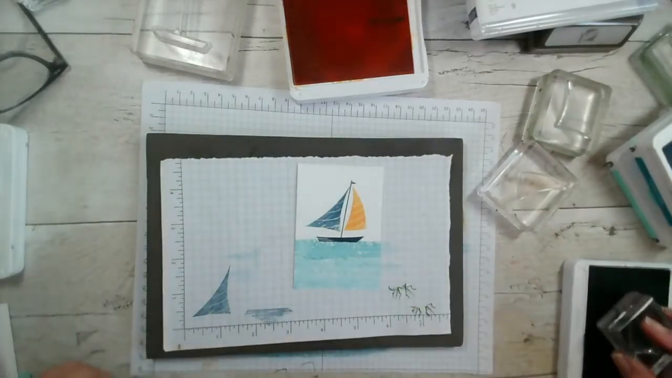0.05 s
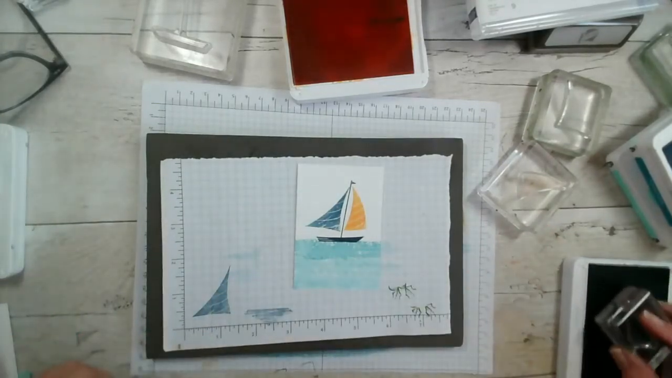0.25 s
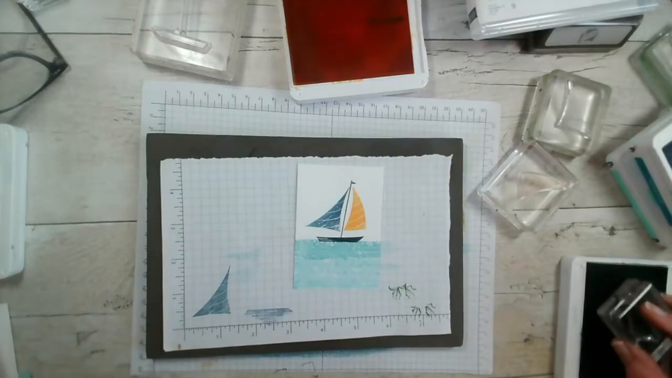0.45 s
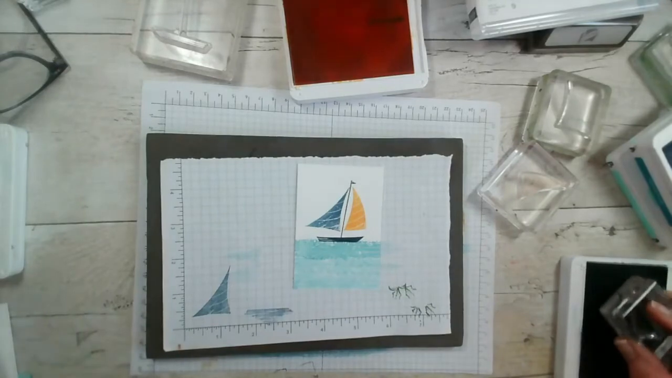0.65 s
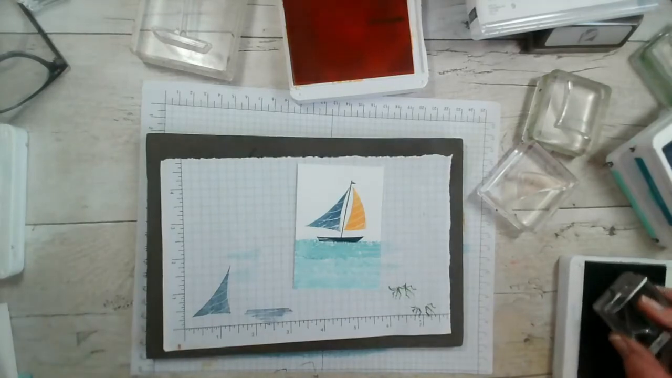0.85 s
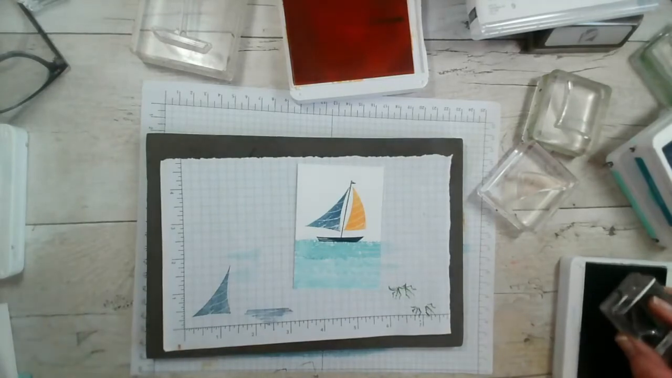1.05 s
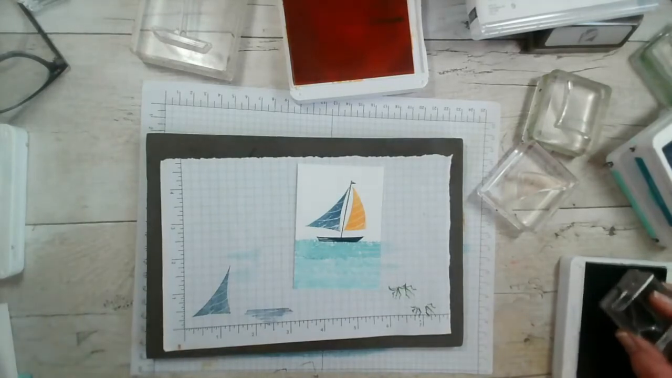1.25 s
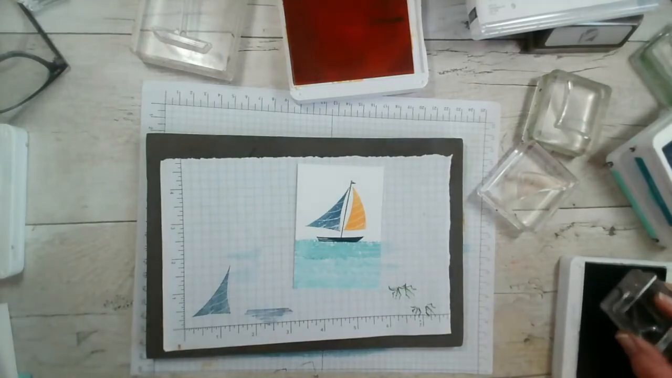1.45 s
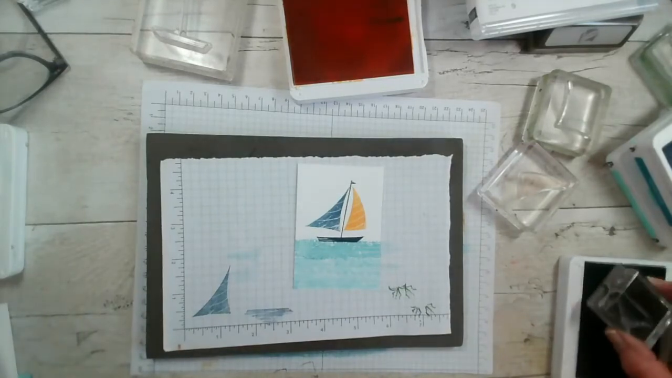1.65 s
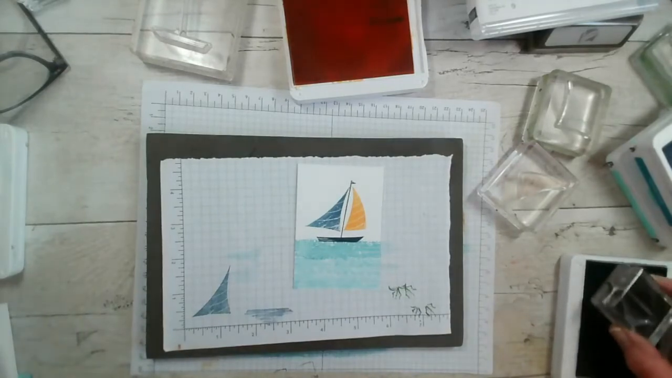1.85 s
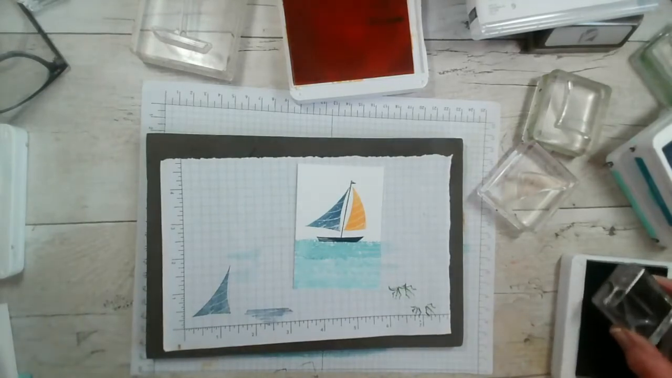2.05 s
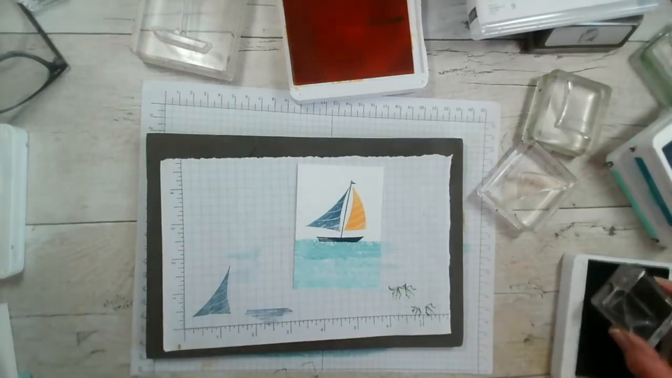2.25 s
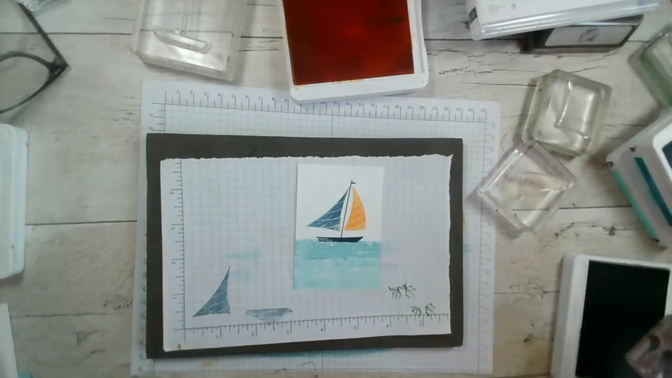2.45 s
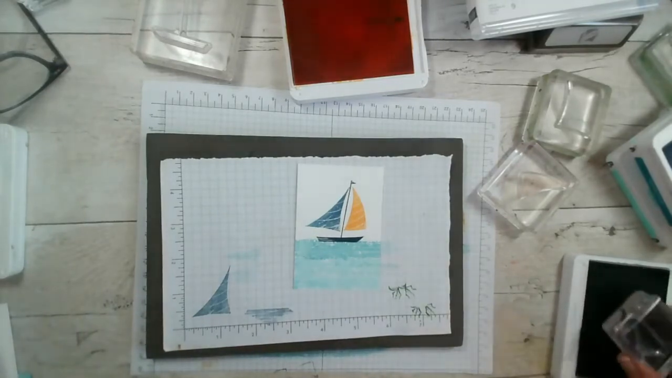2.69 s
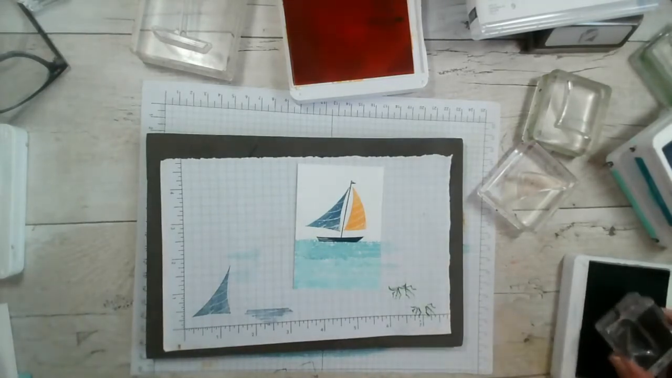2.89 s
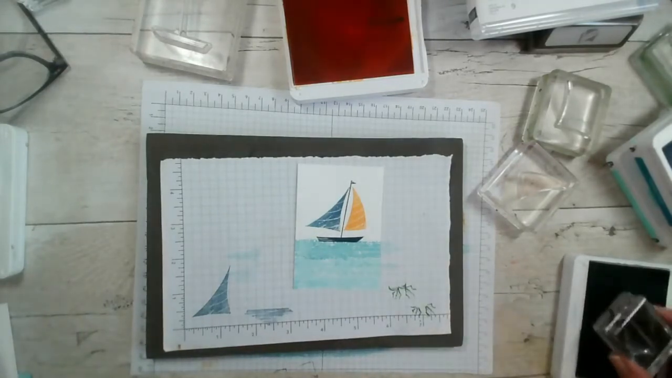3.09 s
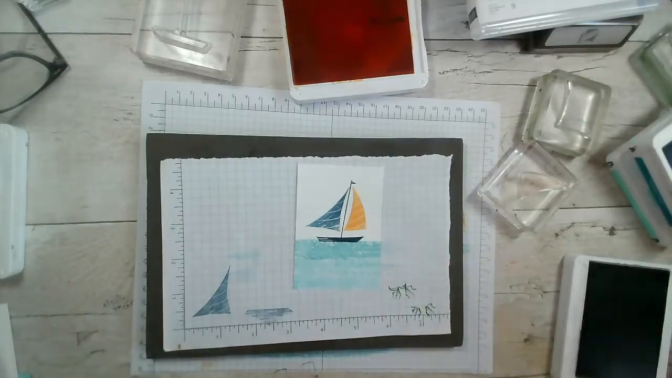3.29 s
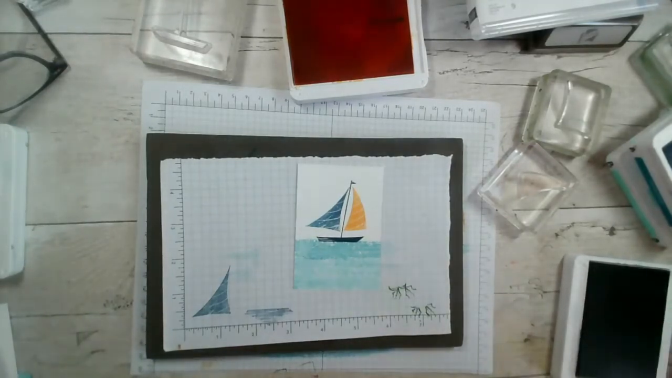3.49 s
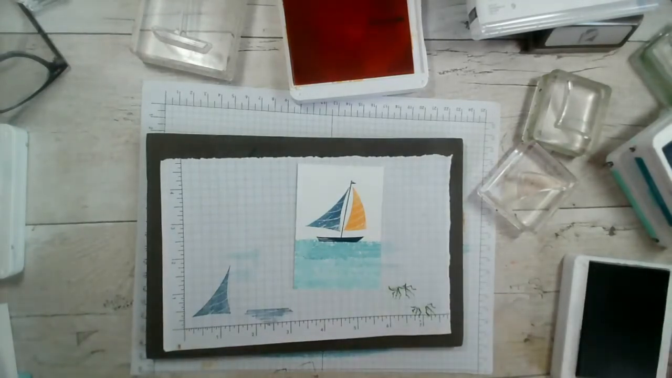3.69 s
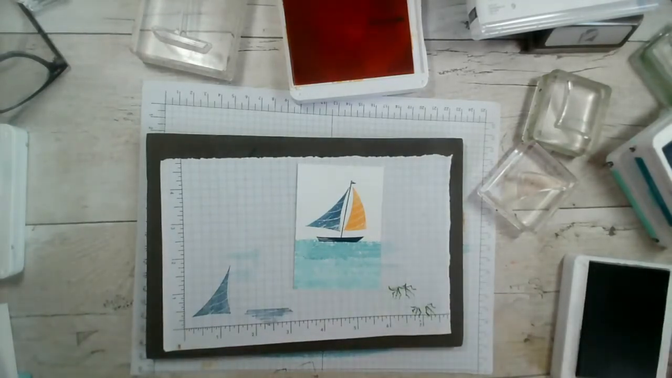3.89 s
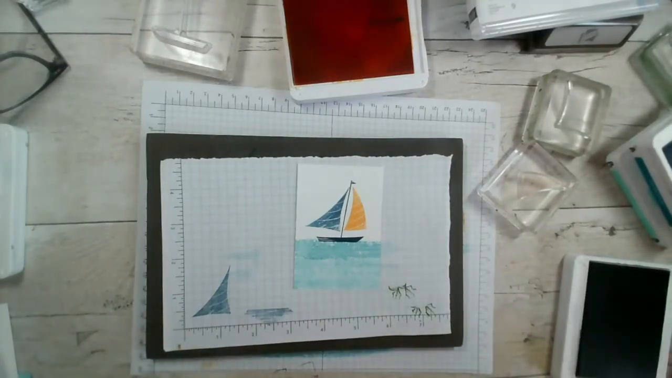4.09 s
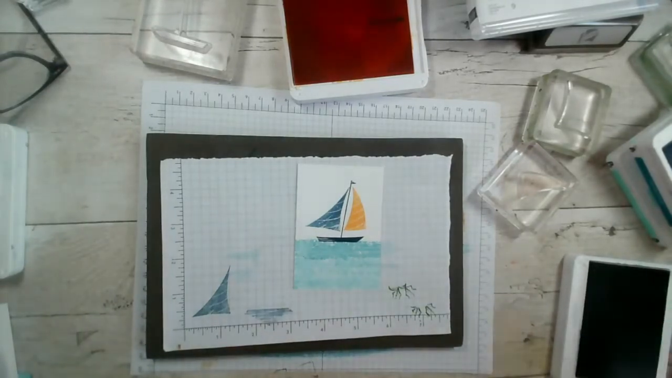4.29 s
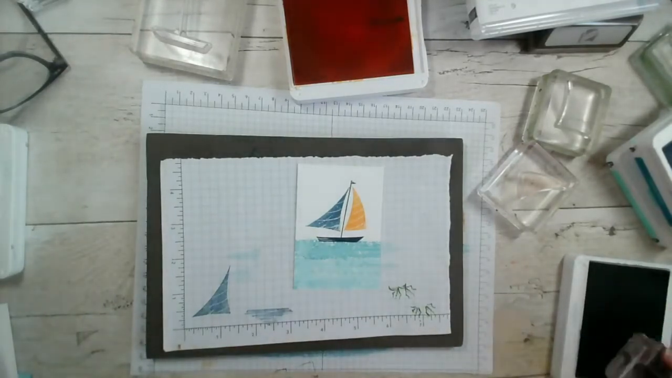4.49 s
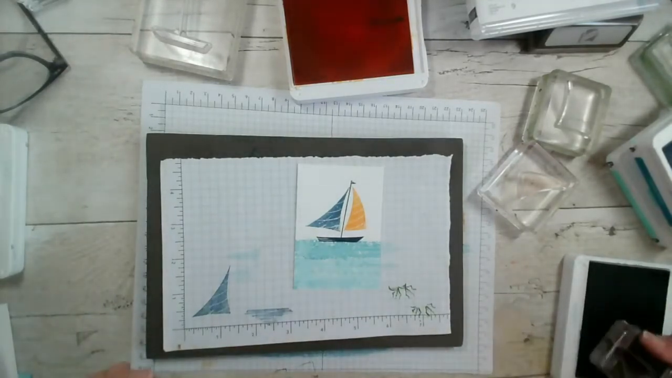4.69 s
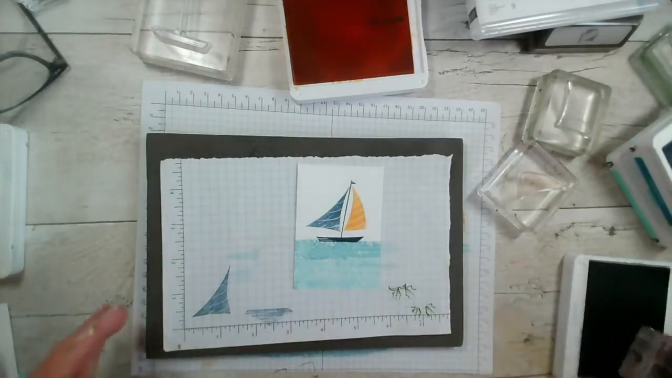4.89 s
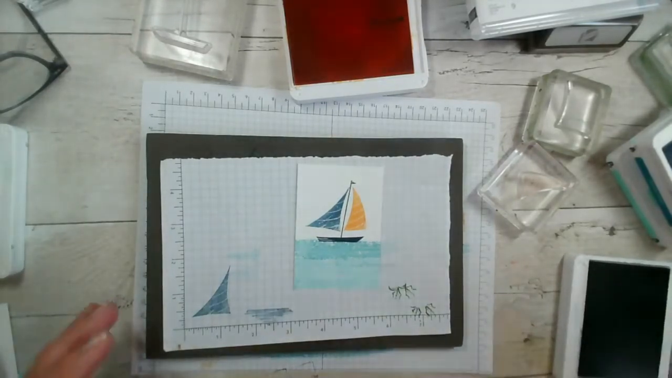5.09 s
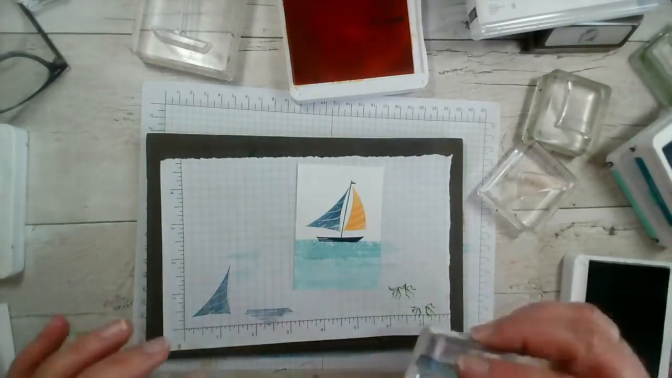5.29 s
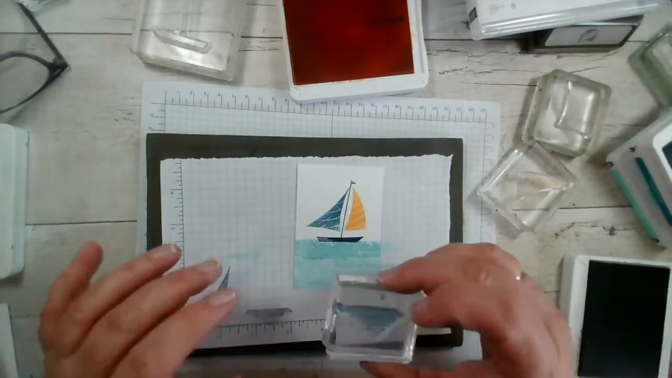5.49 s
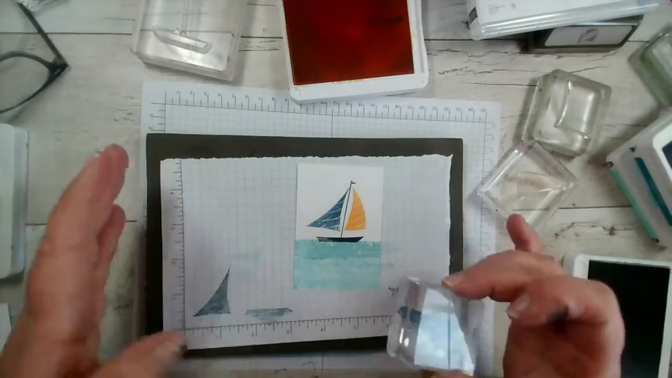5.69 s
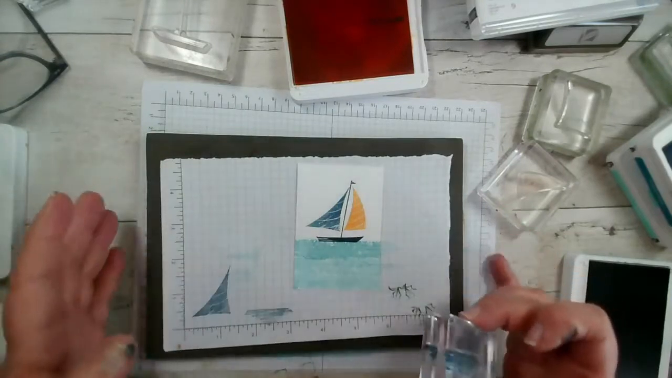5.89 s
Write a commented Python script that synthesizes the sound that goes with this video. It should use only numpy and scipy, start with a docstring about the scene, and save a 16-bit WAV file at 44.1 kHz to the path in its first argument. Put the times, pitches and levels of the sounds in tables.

```python
"""On a craft table in a quiet room, a clear acrylic stamp block is dabbed quickly on an ink pad.
Each dab is an impact through a soft contact, which excites the bending modes of the table top.
The tacky pad clings as the block lifts: its plastic case is raised a little and falls back with
a knock of ringing modes and hard ticks; once, late on, the block's hard edge strikes the pad.
Beneath lie room noise, a fan, a thin whine, swishes of moving arms and a low table rumble."""
import sys
import numpy as np
from scipy import signal
from scipy.fft import rfft, irfft
from scipy.io import wavfile

SR = 44100
rng = np.random.default_rng(int(sys.argv[2]) if len(sys.argv) > 2 else 0)


def inscribe(sig):
    """Save sig as 16-bit PCM at rate SR to the path in sys.argv[1].

    A 1-D sig is mono; a 2-D sig holds one channel per row.
    Samples are clipped to [-1, 1] before scaling.
    """
    pcm = np.round(np.clip(np.atleast_2d(sig).T, -1, 1) * 32767)
    wavfile.write(sys.argv[1], SR, pcm.astype(np.int16))


N = 262130  # length of the scene, samples
SIZE = 16384  # length of one impulse response, samples
T = np.arange(SIZE) / SR
HZ = np.fft.rfftfreq(SIZE, 1 / SR)

# steady room noise, relative spectrum: (f/Hz, level/dB)
AIR_COLOUR = [(12, -32.5), (22, -3.5), (70, -9), (105, -4), (150, -16.5), (190, -11.5), (300, -19),
              (520, -18), (950, -22), (1620, -31), (1850, -29.5), (3000, -28), (4800, -36), (15500, -52.5)]
# resonances of a small fan: (centre f/Hz, width scale f/Hz, rms level/dB)
FAN_RESONANCES = [(92.5, 3.2, -68), (115, 8.9, -70.5), (189.4, 3.8, -70), (295, 14, -81),
                  (527.8, 17, -76.5), (1358, 160, -76.5), (1605, 190, -75.5), (1662, 14, -80.5),
                  (2942, 44, -84.5), (3490, 350, -82)]
# thin electrical whine: (f/Hz, rms level/dB)
WHINE_TONES = [(2000, -93.5), (10000, -105)]
# relative spectrum of a swish: (f/Hz, level/dB)
SWISH_SPECTRUM = [(1500, -12), (3500, 4.5), (5500, -2.5), (8000, -5.5), (12000, -8.5), (15500, -12)]
# faint swishes as the arms move: (start t/s, length t/s, level/dB before a common 3 dB cut)
ARM_SWISHES = [(0.6, 0.48, -76), (1.3, 0.41, -75), (1.68, 0.39, -77.5), (2.48, 0.31, -75),
               (3.0, 0.57, -77.5), (5.05, 0.66, -74.5), (5.65, 0.54, -78)]
# relative spectrum of the table's rumble: (f/Hz, level/dB)
RUMBLE_SPECTRUM = [(12, -19.5), (25, 0.5), (55, 2.5), (90, 2.5), (120, -5.5), (150, -25), (300, -37.5),
                   (1000, -63)]
# the arms lean on the table: (start t/s, length t/s, level/dB)
ARM_LEANS = [(4.33, 0.48, -59), (5.88, 0.27, -53)]
# the pad case knocks on the table, mostly a tenth of a second after a dab;
# at 4.616 s the block's hard edge strikes the pad:
# (t/s, push level/dB, contact corner f/Hz, pitch of the struck edge f/Hz)
HARD_KNOCKS = [(0.167, -33, 600, 1100), (0.348, -30, 596, 1100), (0.548, -26, 700, 1100),
               (0.767, -24.5, 500, 900), (0.9636, -18, 590, 680), (1.158, -20.5, 610, 690),
               (1.336, -8, 453, 500), (1.349, -11, 1390, 990), (1.567, -17, 547, 600),
               (1.757, -20, 494, 596), (1.922, -21, 550, 596), (2.101, -13, 500, 590),
               (2.2618, -2.5, 1700, 1580), (2.8747, -17.5, 447, 890), (3.1425, -15, 910, 960),
               (4.616, 2.5, 313, 533), (4.8622, -0.5, 2855, 970)]
# modes of the plastic case: (f/Hz, relative level/dB, t60 t/s)
CASE_MODES = [(222, 1, 0.094), (302.2, 0.5, 0.12), (399, -6.5, 0.097), (572, -15.5, 0.16),
              (595, -13.5, 0.065), (682, -10.5, 0.057), (880, -16.5, 0.15), (950, -17, 0.15),
              (1050, -23, 0.1), (1297, -20.5, 0.072), (1700, -21.5, 0.032), (2550, -15.5, 0.04),
              (3370, -28, .03)]
# relative spectrum of the case's dense upper modes: (f/Hz, level/dB)
CLATTER_SPECTRUM = [(120, -29), (230, -5), (450, 7), (950, 8), (1600, -16), (2200, -12.5), (3600, -5),
                    (8000, -21), (15000, -25)]
# relative spectrum of a tick of hard edges: (f/Hz, level/dB)
TICK_SPECTRUM = [(500, 3), (1500, 15.5), (3500, 8), (5500, 3.5), (6800, -4), (7800, 3.5), (9500, -14),
                 (11000, -32), (15000, -35)]
# relative spectrum of a pat of rubber on wet ink: (f/Hz, level/dB)
PAT_SPECTRUM = [(150, -16), (400, 12), (640, 4.5), (820, -8), (1100, -6.5), (1600, -30), (3000, -31.5),
                (9000, -54)]
# the block pressed on the pad; a higher corner is a harder contact:
# (t/s, push level/dB, contact corner f/Hz, pat level/dB)
PAD_DABS = [(0.0684, -4.5, 250, -53), (0.2315, -4, 236, -54.5), (0.4295, -1.5, 350, -47.5),
            (0.6466, -0.7, 316, -52), (0.856, -5, 272, -60), (1.0492, -4.5, 262, -77),
            (1.237, 0.5, 440, -46.5), (1.4572, -1, 333, -54.5), (1.6555, -3, 208, -64),
            (1.82, -5.5, 294, -72), (1.997, -0.2, 275, -58), (2.1627, 0.1, 320, -54),
            (2.7077, -3.5, 103, -68), (2.9964, -1, 215, -66)]
# bending modes of the table top: (f/Hz, relative level/dB, t60 t/s)
TABLE_MODES = [(58.2, -22, 0.24), (103.5, -18.5, 0.041), (115.5, -48, 1), (165.5, -16.5, 0.057),
               (186.1, -12.5, 0.042), (284.2, -16, 0.021), (297.3, -30.5, 0.092), (363.3, -39.5, 0.2),
               (382.3, -26.5, 0.044), (484.4, -32, 0.046)]

# ring of the case at 0 dB push
RING_DB = -32.5
# each knock is two contacts 13 ms apart: the first is a touch of constant level
TOUCH_LEAD_S, TOUCH_DB, TOUCH_HZ, TOUCH_EDGE_HZ = 0.013, -57, 1210, 1030
# tick against ring: for a landing with its corner at TOUCH_HZ, growth with hardness, for a touch
TICK_DB, TICK_DB_PER_OCTAVE, TOUCH_TICK_DB = -20.5, 5, -9.5
# the block clips the plastic rim once on its way down
RIM_S, RIM_DB = 0.4103, -56.5
# the table rumbles on after every blow; level at 0 dB push
RUMBLE_DB, RUMBLE_T60_S = -48.5, 1.2


def amp(db):
    """Logarithmic level: converts decibels to an amplitude gain."""
    return 10 ** (np.asarray(db) / 20)


def unit(x):
    """Normalisation: scales a signal to rms 1."""
    return x / np.sqrt(np.mean(x ** 2) + 1e-30)


def add(mix, s, sound):
    """Superposition: adds a sound to the mix at time s."""
    part = mix[max(round(s * SR), 0):][:len(sound)]
    part += sound[:len(part)]


def noise(colour, size):
    """Spectral shaping: white noise filtered to (f/Hz, level/dB) points, at rms 1."""
    hz, db = np.transpose(colour)
    log_hz = np.log(np.fft.rfftfreq(size, 1 / SR) + 1)
    gain = amp(np.interp(log_hz, np.log(hz), db))
    return unit(irfft(rfft(rng.standard_normal(size)) * gain, size))


def ring(modes):
    """Modal superposition: exponentially dying sines, neighbours swinging in opposite senses."""
    response = np.zeros(SIZE)
    for k, (hz, db, t60) in enumerate(modes):
        sense = (-1) ** (k + 1)
        response += sense * amp(db - 60 * T / t60) * np.sin(2 * np.pi * hz * T)
    return response


def strike(s, response, corner_hz):
    """Contact filtering: a soft blow at time s excites little above its corner, itself 9 dB down."""
    lead = SIZE // 32  # room for the filter's symmetric spread ahead of the blow
    contact = (1 + (HZ / corner_hz) ** 2) ** -1.5
    out = np.zeros(N)
    add(out, s - lead / SR, irfft(rfft(np.roll(response, lead)) * contact))
    return out


def swells(rows, attack_s=0.045, release_s=0.18):
    """Amplitude envelope: gentle movements rise, hold and fade linearly."""
    t = np.arange(N) / SR
    level = np.zeros(N)
    for s, length, db in rows:
        rise = (t - s) / attack_s
        fall = (s + length - t) / release_s
        level += amp(db) * np.clip(np.minimum(rise, fall), 0, 1)
    return level


def air(level_db=-63.5):
    """Stationary random noise: the steady sound of the room."""
    return amp(level_db) * noise(AIR_COLOUR, size=N)


def fan():
    """Resonance: a small fan concentrates broadband noise into humps of power."""
    hz = np.fft.rfftfreq(N, 1 / SR)
    power = np.zeros(len(hz))
    for centre, width, db in FAN_RESONANCES:
        hump = (1 + ((hz - centre) / width) ** 2) ** -3
        power += amp(db) ** 2 * hump / hump.mean()
    return irfft(rfft(rng.standard_normal(N)) * np.sqrt(power), N)


def whine():
    """Pure tones: steady sines of a thin electrical whine."""
    t = np.arange(N) / SR
    return sum(amp(db) * np.sqrt(2) * np.sin(2 * np.pi * hz * t) for hz, db in WHINE_TONES)


def swishes(cut_db=-3):
    """Amplitude modulation: moving arms swell and fade a treble noise."""
    return amp(cut_db) * swells(ARM_SWISHES) * noise(SWISH_SPECTRUM, size=N)


def rumble():
    """Addition of powers: low noise dies away after each blow and swells as the arms lean."""
    t = np.arange(N) / SR
    power = swells(ARM_LEANS) ** 2
    for s, db, *_ in PAD_DABS + HARD_KNOCKS:
        power += (t > s) * amp(RUMBLE_DB + db - 60 * abs(t - s) / RUMBLE_T60_S) ** 2
    return np.sqrt(power) * noise(RUMBLE_SPECTRUM, size=N)


def room(x, wet_db=-21, t60=0.21, first_s=0.026):
    """Reverberation: a small furnished room returns a weak, short, diffuse tail."""
    tail = rng.standard_normal(SIZE) * amp(-60 * T / t60) * (T > first_s)
    tail /= np.linalg.norm(tail)
    return x + amp(wet_db) * signal.fftconvolve(x, tail)[:N]


def landings():
    """Successive contacts: a touch of constant level, then a landing, fainter or much louder, 13 ms on."""
    # yields (t/s, ring level/dB, contact corner f/Hz, edge pitch f/Hz, tick level/dB)
    for s, push_db, corner_hz, edge_hz in HARD_KNOCKS:
        ring_db = RING_DB + push_db
        octaves_harder = np.log2(corner_hz / TOUCH_HZ)
        tick_db = ring_db + TICK_DB + TICK_DB_PER_OCTAVE * octaves_harder
        yield s - TOUCH_LEAD_S, TOUCH_DB, TOUCH_HZ, TOUCH_EDGE_HZ, TOUCH_DB + TOUCH_TICK_DB
        yield s, ring_db, corner_hz, edge_hz, tick_db


def ticks(tail_db=-23, late_s=0.001483):
    """Hard contact: touching edges give a few milliseconds of treble and a faint tail."""
    t60, tail_t60 = 0.011, 0.08  # s
    fade = amp(-60 * T / t60) + amp(tail_db - 60 * T / tail_t60)
    contacts = [(RIM_S, RIM_DB)] + [(s + late_s, db) for s, *_, db in landings()]
    out = np.zeros(N)
    for s, db in contacts:
        add(out, s, amp(db) * fade * noise(TICK_SPECTRUM, size=SIZE))
    return out


def case(late_s=0.002, crack_db=-2, clatter_db=-17, edge_db=2, muffled_db=-42):
    """Modal density: a struck case rings in a few main modes, an edge, and a noise of dense upper modes."""
    crack_t60, clatter_t60, edge_t60 = 0.016, 0.15, 0.024  # s
    fade = amp(crack_db - 60 * T / crack_t60) + amp(clatter_db - 60 * T / clatter_t60)
    modes = ring(CASE_MODES)
    out = np.zeros(N)
    for s, db, corner_hz, edge_hz, _ in landings():
        edge = ring([(edge_hz, edge_db, edge_t60)])
        clatter = fade * noise(CLATTER_SPECTRUM, size=SIZE)
        out += amp(db) * strike(s + late_s, modes + edge + clatter, corner_hz)
    # dabs reach the case only through the soft pad
    for s, db, corner_hz, _ in PAD_DABS:
        clatter = fade * noise(CLATTER_SPECTRUM, size=SIZE)
        out += amp(db + muffled_db) * strike(s + late_s, modes + clatter, corner_hz)
    return out


def pats(early_s=0.00262, rise_s=0.0015, t60=0.07):
    """Transient noise: the rubber meets the wet pad just ahead of the full push."""
    swell = (1 - np.exp(-T / rise_s)) * amp(-60 * T / t60)
    swell /= swell.max()
    out = np.zeros(N)
    for s, _, _, db in PAD_DABS:
        add(out, s - early_s, amp(db) * swell * noise(PAT_SPECTRUM, size=SIZE))
    return out


def table(lag_s=0.003018, hardest_hz=750, light_hz=125, hold_s=0.065, release_s=0.0048, left_db=-12):
    """Dispersion of bending waves: dabs and knocks thump the table top, treble arriving first."""
    # delay falls with the root of frequency: 100 Hz comes lag_s late
    response = rfft(ring(TABLE_MODES)) * np.exp(-4j * np.pi * lag_s * np.sqrt(HZ * 100))
    # the hand bounces with the table while it presses, and takes most of the swing away as it lifts
    held = 0.5 - 0.5 * np.tanh((T - hold_s) / release_s)
    pressed = irfft(response) * amp(left_db * (1 - held))
    # a light knock moves little bass (gain 2/3 at light_hz) and leaves the table to ring freely
    knocked = irfft(response * HZ ** 2 / (HZ ** 2 + light_hz ** 2 / 2))
    out = np.zeros(N)
    for s, db, corner_hz, _ in PAD_DABS:
        out += amp(db) * strike(s, pressed, corner_hz)
    for s, db, corner_hz, _ in HARD_KNOCKS:
        out += amp(db) * strike(s, knocked, min(corner_hz, hardest_hz))
    return out


def scene():
    """Superposition: all sources add at one microphone above the table."""
    background = air() + fan() + whine() + swishes()
    impacts = ticks() + case() + pats() + table()
    return (background + rumble() + room(impacts))[None]


def record(dry, edge_hz=15700):
    """Band limitation: a symmetric low-pass filter sets the recorder's upper edge."""
    lowpass = signal.firwin(511, edge_hz, window=("kaiser", 9), fs=SR)
    return signal.oaconvolve(dry, lowpass[None], "same")


dry = scene()
out = record(dry)
inscribe(out)
```